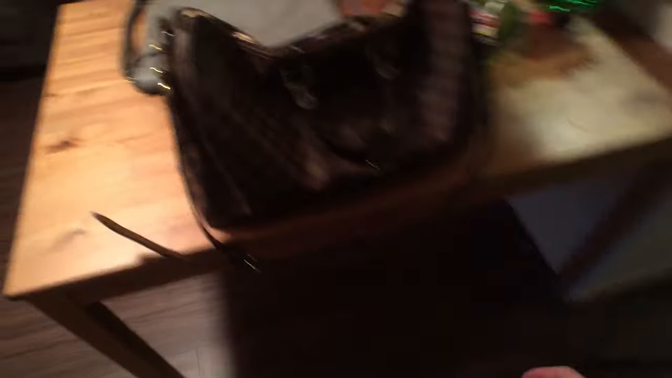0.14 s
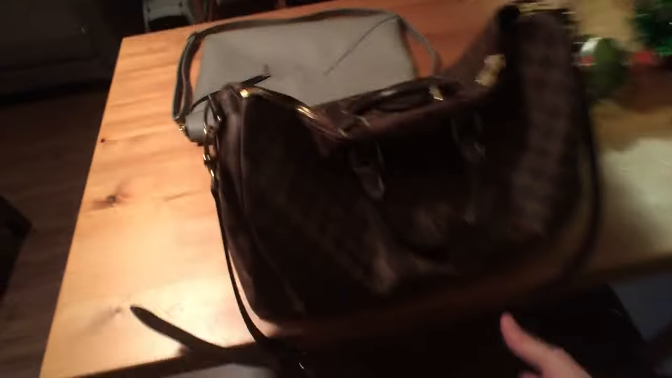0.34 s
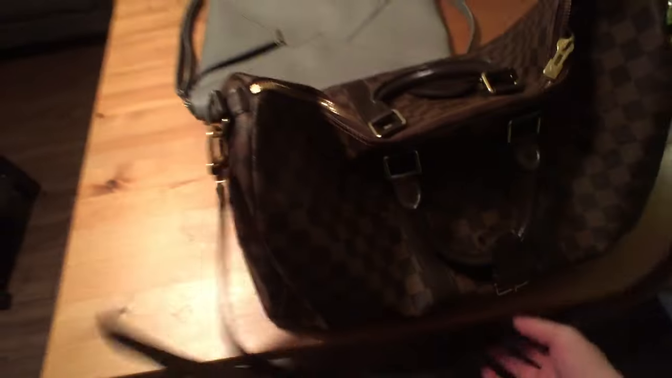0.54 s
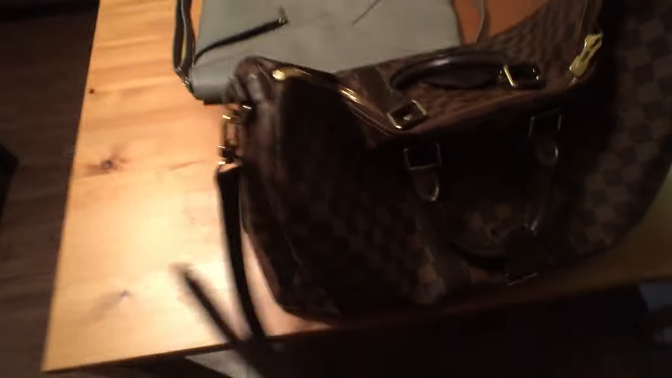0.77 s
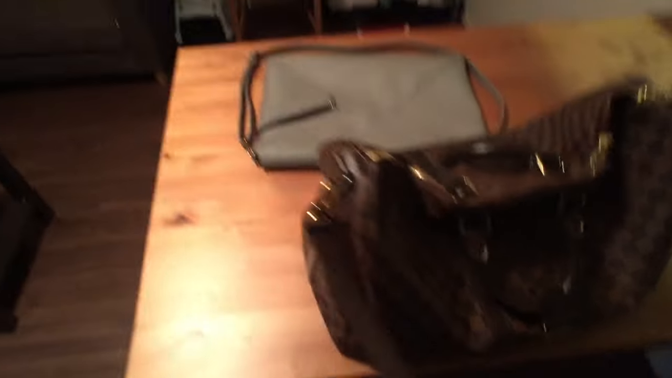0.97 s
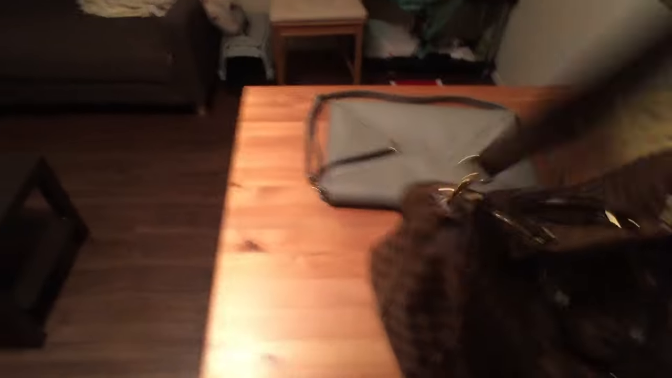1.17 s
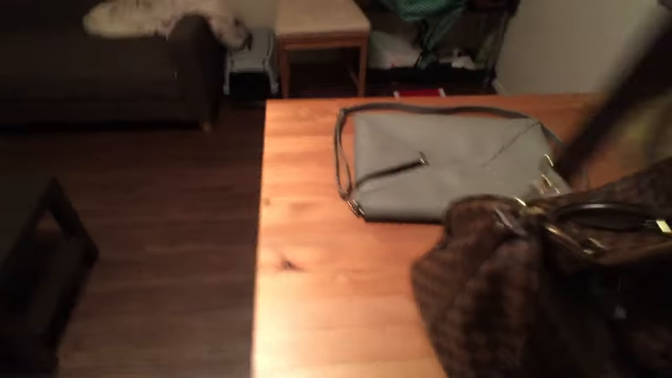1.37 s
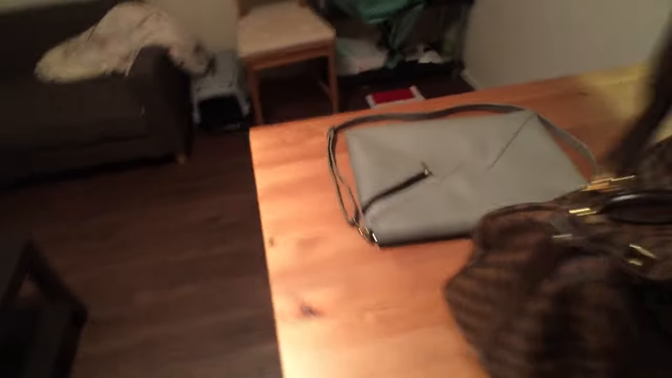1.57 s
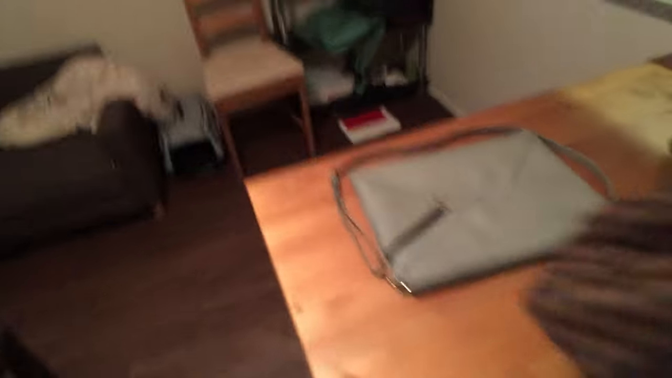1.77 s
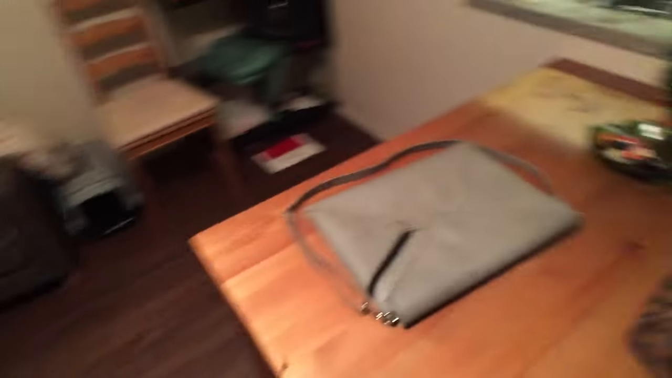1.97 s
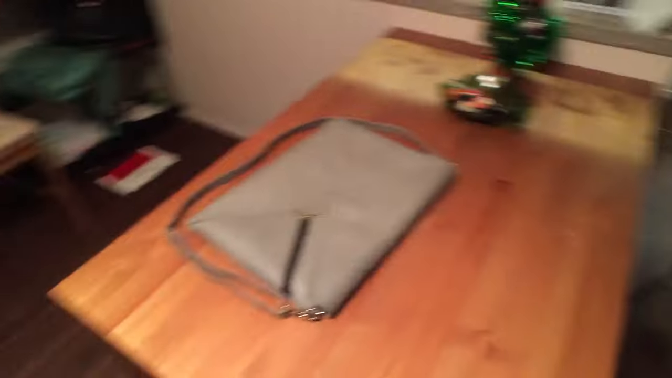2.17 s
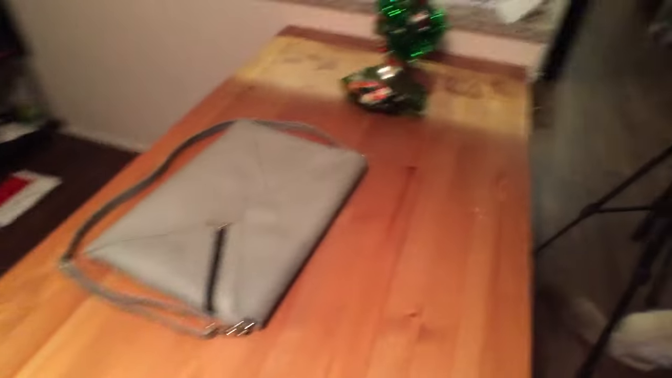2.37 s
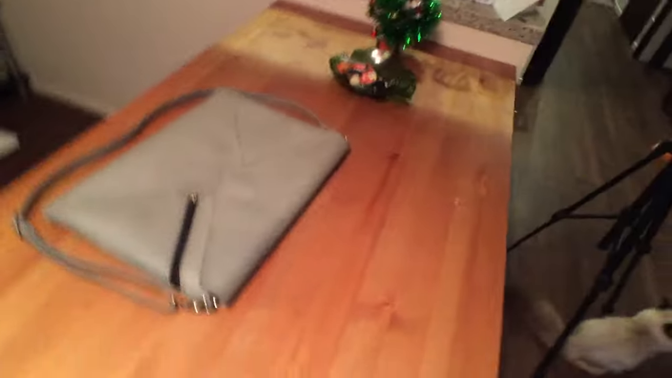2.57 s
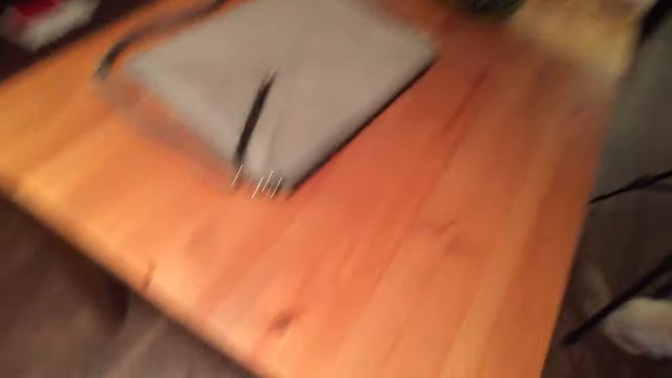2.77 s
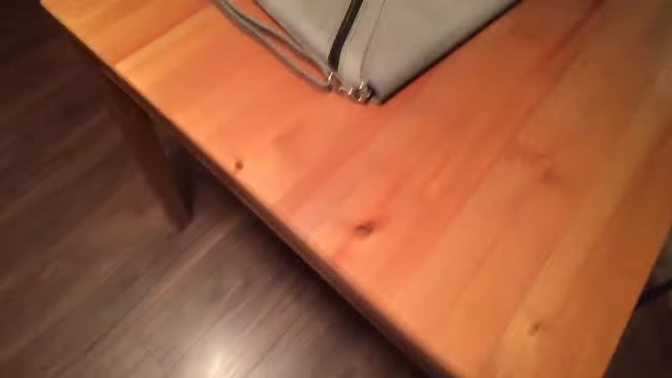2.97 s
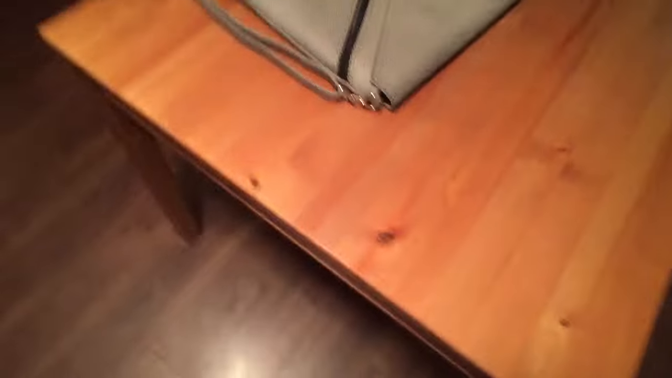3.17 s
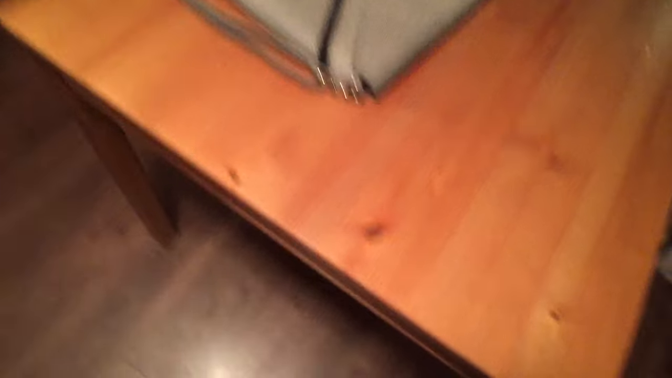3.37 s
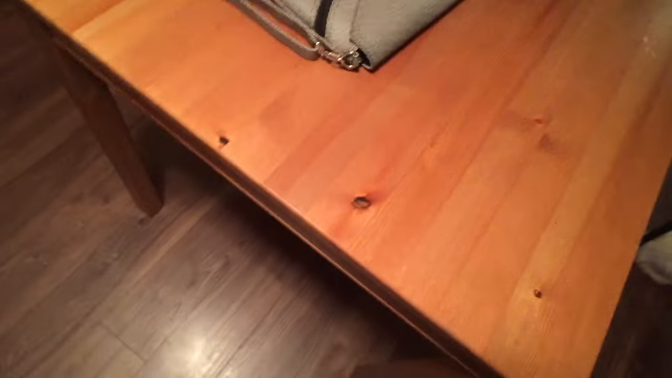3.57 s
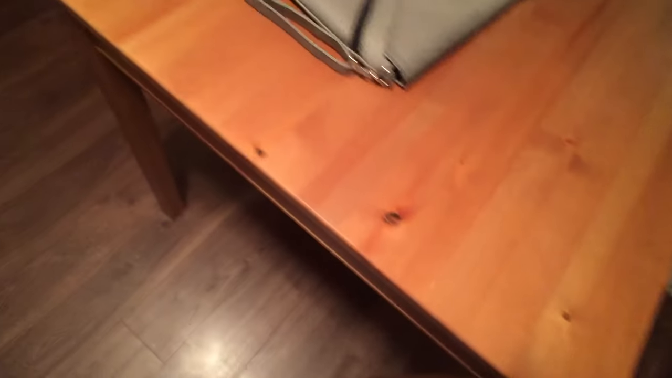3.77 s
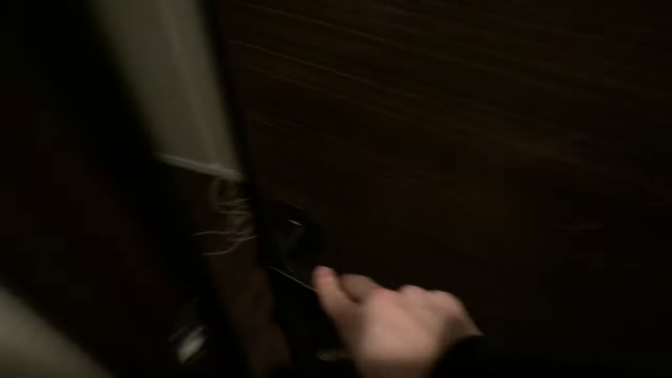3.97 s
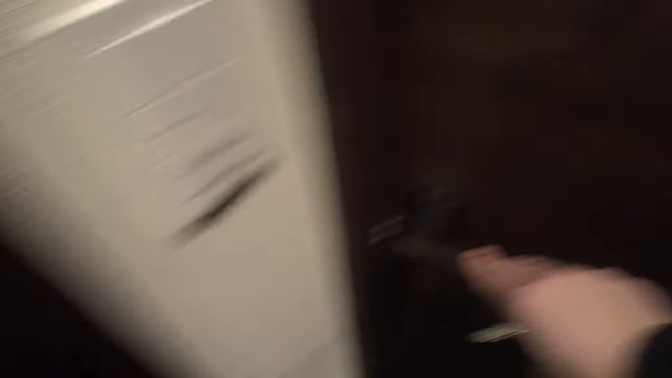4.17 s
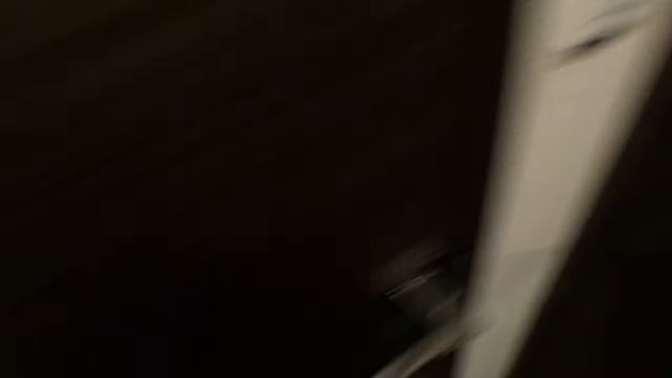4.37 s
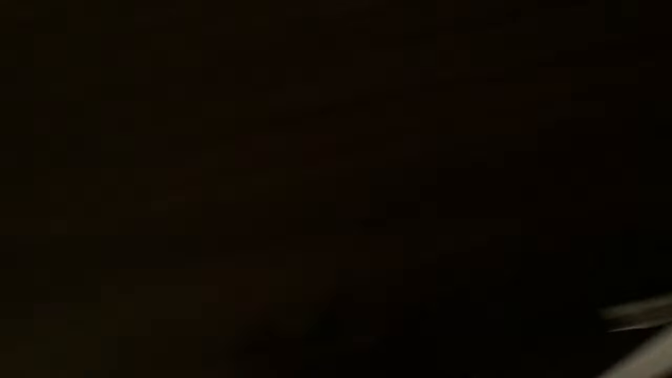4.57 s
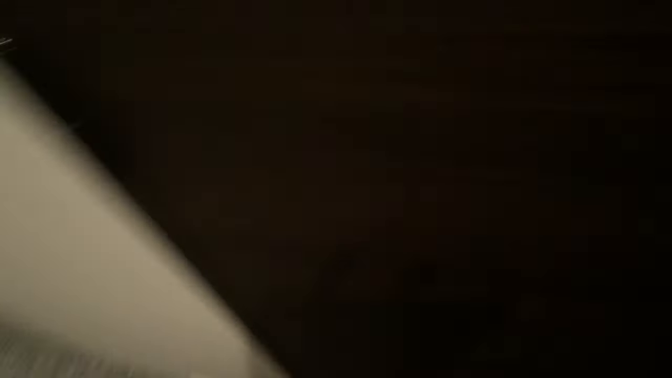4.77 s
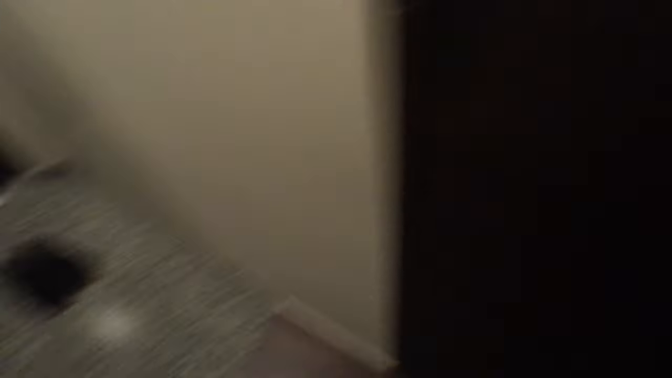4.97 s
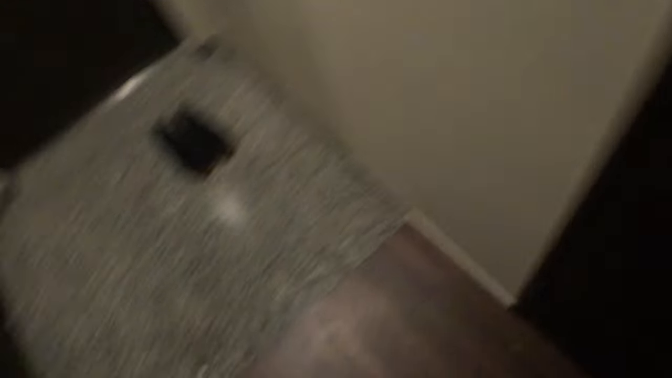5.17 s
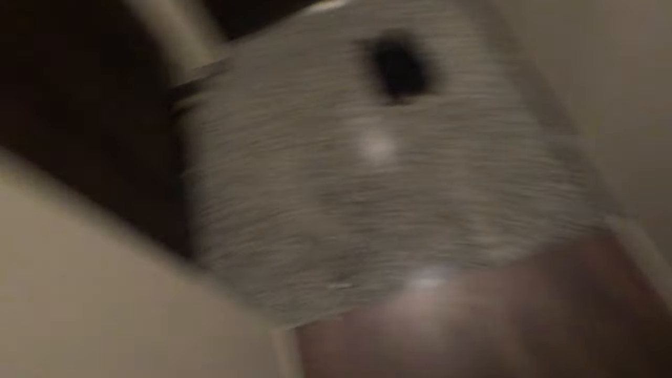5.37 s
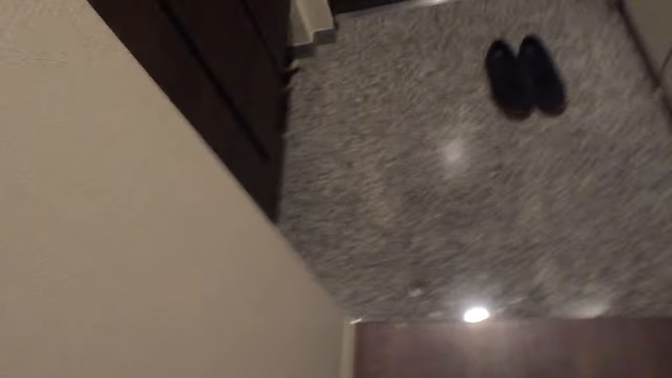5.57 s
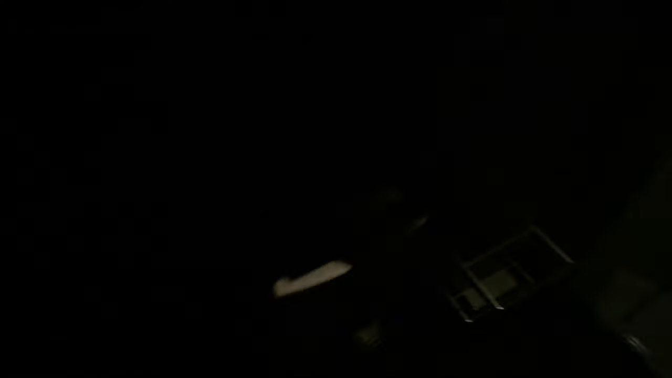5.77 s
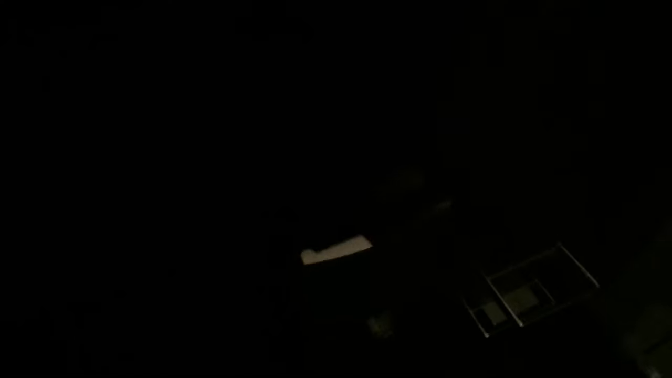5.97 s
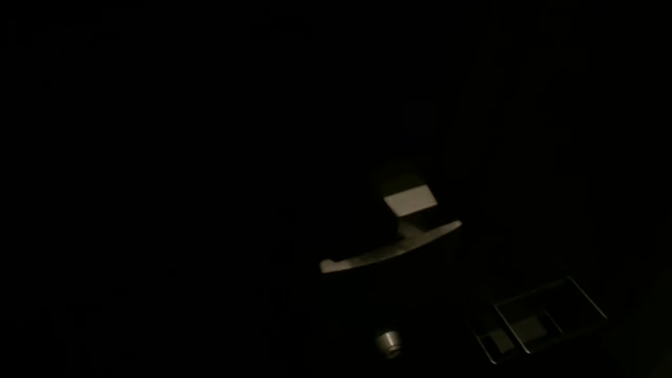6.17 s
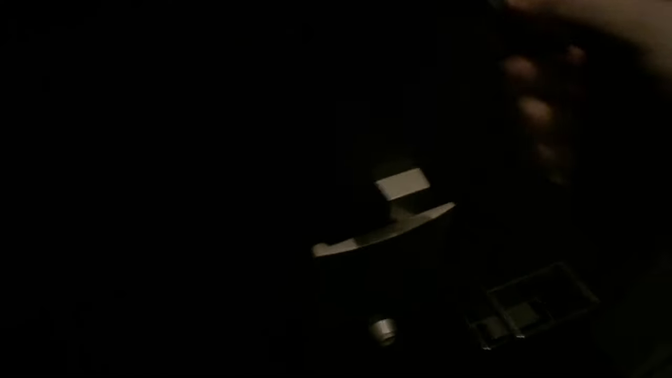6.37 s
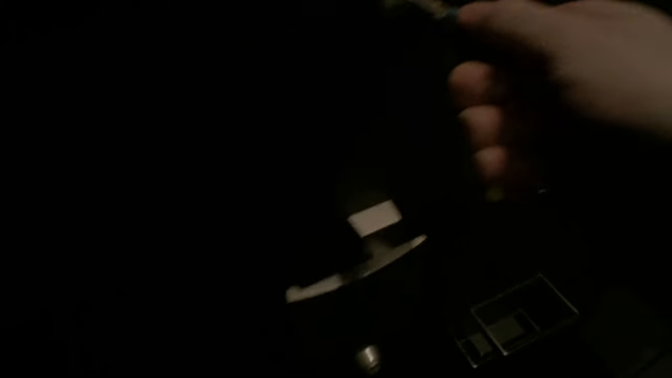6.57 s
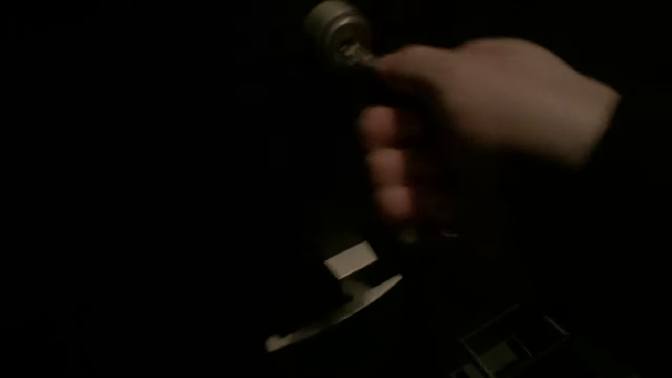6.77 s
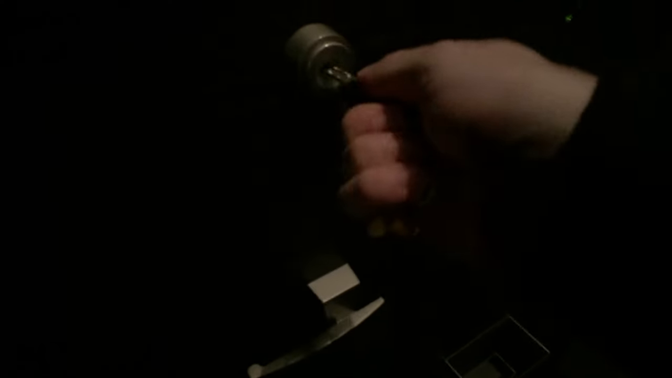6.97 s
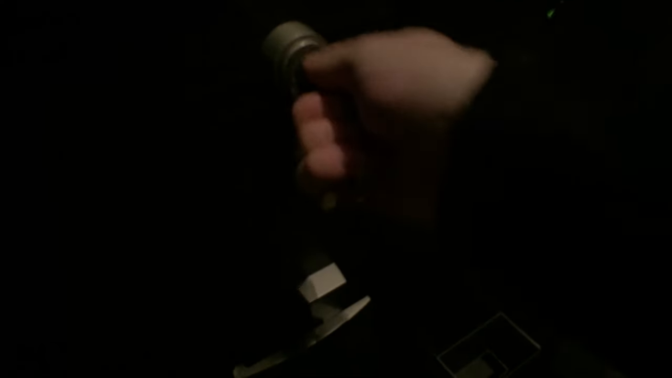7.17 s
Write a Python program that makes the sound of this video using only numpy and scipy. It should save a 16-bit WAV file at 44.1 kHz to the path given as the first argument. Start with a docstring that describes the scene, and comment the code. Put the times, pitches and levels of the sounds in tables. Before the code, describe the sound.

A leather bag is dragged and lifted off a wooden table, rustling and bumping softly while its brass buckle clinks. After a few dull knocks, a door latch clicks sharply and the wooden door opens with a heavy thud. It then shuts with another thud and a ringing rattle of the lock. A key ticks against the lock and scrapes in. Everything is close, in a quiet room and then a hallway.

```python
"""A wooden door is unlatched and shut, then shuts again, heard from the hall: its panel thuds, its latch
clicks and its metal lock rings. A key then ticks against the lock and scrapes in over the pins.
Before the door, a leather bag is dragged and lifted off a wooden table, and its brass buckle clinks.
Cloth and leather rub and rustle throughout, with a few short squeaks, over a quiet room."""
import sys
import numpy as np
from scipy import signal
from scipy.fft import rfft, irfft, next_fast_len
from scipy.io import wavfile
from scipy.ndimage import map_coordinates

SR = 44100
rng = np.random.default_rng(int(sys.argv[2]) if len(sys.argv) > 2 else 0)


def to_wav(s):
    """Save 16-bit WAV."""
    ch = np.atleast_2d(s).T  # columns
    pcm = np.round(np.clip(ch, -1, 1) * 32767)  # PCM
    wavfile.write(sys.argv[1], SR, pcm.astype(np.int16))


N = 318754
HALL_S = 5.85  # from here on we listen in the hall

# the room's echo; a ring time is how long a sound takes to fall 60 dB: (pitch [Hz], ring time [s])
ROOM = [(300, 0.36), (1300, 0.31), (4000, 0.4), (8000, 0.25), (15000, 0.19)]
# faint, constant stirring between the bigger moves: (time [s], rubbing [dB], shaking [dB])
STIR = [(0, -74, -70.5), (.4, -62.5, -56), (1.1, -66.5, -54), (1.4, -75, -61), (2.1, -81, -62.5),
        (2.75, -69, -66), (3.45, -72.5, -63), (3.83, -76.5, -71), (3.9, -67.5, -75), (4.15, -65.5, -43),
        (4.3, -67, -57), (4.9, -67, -72.5), (5.4, -71, -63.5), (5.75, -69, -75), (5.84, -64, -68),
        (6.25, -80.5, -67.5), (6.45, -76, -55), (7.23, -69.5, -51.5)]


def door_thuds():
    """Each blow makes the wooden door ring with a few low tones."""
    blows = [(4.223, -32.5, 5.5), (4.272, -22, -10), (4.311, -33, 1), (4.517, 5.5, 2), (4.54, -17, 1.5),
             (4.598, -14, 3), (5.891, -30.5, 5), (5.961, -2.5, 0), (6.004, -15.5, 5), (6.034, -8.5, -1.5),
             (6.475, -48, 10), (6.634, -58, 10.5), (6.692, -49.5, 9.5), (6.815, -51.5, 11)]  # (time [s], level [dB], brightness [dB per octave])
    tones = [(54.8, -1.5, .4), (78.9, -2.5, 0.42), (133.4, -10, 0.23), (175.4, 1, 0.12), (234, -1.5, 0.081),
             (294.5, -18, 0.28), (413.4, -16, 0.13), (540, -21, 0.11)]  # (pitch [Hz], level [dB], ring time [s])
    return struck(blows, tones, attack_s=0.0035, drop_db=9, flutter=0.0094)


def lock_rattle():
    """Latch and key shake the metal case of the lock, which rings."""
    blows = [(4.313, -16, 9.5), (4.521, -14.5, 5), (5.068, -12, -14.5), (5.896, -25, 9.5),
             (5.971, -31, 16.5), (6.006, -11.5, 0.5), (6.467, -15, -6), (6.633, -21.5, -10.5),
             (6.69, -27.5, -3.5), (6.812, -28.5, 4), (7.007, -26.5, -18), (7.152, -8.5, -13.5)]  # (time [s], level [dB], brightness [dB per octave])
    tones = [(882, -6, 0.27), (1052, 0.5, 0.16), (1270, 5, 0.29), (1400, 4.5, 0.32), (1562, 0.5, 0.44),
             (1768, 5, 0.086), (2084, 7.5, 0.09), (2670, 0, 0.11), (3640, -5, 0.052), (5420, -16.5, .06),
             (6250, -15, 0.033)]  # (pitch [Hz], level [dB], ring time [s])
    return struck(blows, tones, attack_s=0.00025, drop_db=21.5, flutter=0.093)


def metal_clicks():
    """Buckle, latch and key hit hard: each contact is a burst of noise that echoes in room or hall."""
    # (time [s], middle band [dB], low band [dB], high band [dB], echo compared with the burst [dB])
    contacts = [(0.143, -64, -42, -65, -12), (0.6185, -21.5, -26.5, -25.5, 11),
                (0.6688, -37, -16.5, -44, -2), (0.8704, -40, -28, -32, -5), (0.953, -44, -37, -65, -14),
                (0.9715, -45, -24.5, -61, -4), (1.1564, -30.5, -34, -32.5, 1.5),
                (1.1608, -28, -29.5, -22, -5), (1.2174, -39, -43, -49, -7), (1.2447, -22, -62, -11, -6),
                (1.2914, -29, -58.5, -44, -17), (1.4361, -43.5, -49, -39, 7), (1.4753, -36.5, -61, -67, -9),
                (1.5692, -33.5, -44, -60.5, -17), (1.6908, -59, -29, -40, 7), (1.728, -26, -31, -20.5, 5.5),
                (1.7573, -24, -43, -19, -2), (1.8545, -26, -49, -16, -2), (1.908, -25, -53, -42, -1.5),
                (2.5679, -68, -35, -71, -4), (2.9239, -55, -41, -61.5, 4.5), (3.0417, -52, -29, -70, 2),
                (3.34, -69, -34, -73, 3.5), (4.2237, -39, -33, -83.5, -10), (4.313, -3, -7, -8, -2.5),
                (4.519, -36, -12.5, -43, 9.5), (4.5321, -14, -6, -33.5, 3.5), (4.9412, -41, -80, -46, 9),
                (5.0693, -24, -27.5, -26, 14), (5.2464, -38, -38.5, -40, 6.5),
                (5.684, -38, -83.5, -44, -5.5), (5.893, -20.5, -23.5, -23.5, -3),
                (5.9597, -30, -11.5, -42.5, 12.5), (5.9693, -11.5, -15, -33.5, -0.5),
                (6.0072, -4, 1, -8.5, -1), (6.0338, -9.5, -12, -19.5, -3.5),
                (6.4687, -31.5, -16.5, -33, -1), (6.4705, -4.5, -26, -2.5, -15),
                (6.5835, -28, -39, -35, -6.5), (6.6341, -10, -54, -26, -18),
                (6.6625, -19.5, -33, -34, -0.5), (6.6922, -11.5, -27.5, -20, -13),
                (6.8128, -10.5, -25, -13.5, -5), (6.8504, -26, -27, -47, -26),
                (6.9287, -34.5, -71, -28.5, -12.5), (7.0294, -33.5, -64, -66, -5),
                (7.0836, -33.5, -40, -46, -5), (7.123, -28, -60, -51, -13), (7.1264, -27, -50, -31, -15)]
    hall = [(300, 0.057), (1400, 0.35), (3000, 0.22), (8000, 0.18), (15000, 0.11)]  # the hall's echo: (pitch [Hz], ring time [s])
    key_from_s, echo_delay_s = 6.4, .003
    out, t = np.zeros(N + SR), np.arange(SR // 8) / SR
    for s, mid_db, low_db, high_db, echo_db in contacts:
        # the small key sounds in narrower bands
        edges_hz = [(3700, 8000), (700, 2000)] if s > key_from_s else [(2400, 8000), (600, 2400)]
        edges_hz.append((8000, 17000))
        bands = [signal.butter(3, edge, "bandpass", fs=SR, output="sos") for edge in edges_hz]
        gains = amp([mid_db, low_db, high_db])
        ring_s = 0.0097 * amp(0.24 * (mid_db + 22))  # harder contacts last longer
        fade = amp(-60 * t / ring_s)
        parts = [unit(signal.sosfilt(band, fade * rng.standard_normal(len(t)))) for band in bands]
        burst = (gains @ parts) * amp(-6.5) * np.sqrt(np.mean(fade ** 2))
        tail = room_tail(hall if s > HALL_S else ROOM, count=SR * 2 // 3)
        echo = gains @ [unit(signal.sosfilt(band, tail)) for band in bands]
        echo *= amp(echo_db) * np.linalg.norm(burst) / np.linalg.norm(echo)
        out[round(s * SR):][:len(t)] += burst
        out[round((s + echo_delay_s) * SR):][:len(echo)] += echo
    return out[:N]


def key_taps():
    """The key taps the lock's cylinder, and both ring with high tones."""
    taps = [(6.47, -22.5, 4), (6.634, -28.5, -3), (6.663, -43, -9), (6.692, -45, 5), (6.813, -32, -2)]  # (time [s], level [dB], brightness [dB per octave])
    tones = [(4060, -3, 0.18), (5400, 0, 0.073), (6900, -4, .07), (9200, -1, 0.055), (9895, -12, .08)]  # (pitch [Hz], level [dB], ring time [s])
    return struck(taps, tones, attack_s=.0005, drop_db=6, flutter=.1)


def key_scrape():
    """The key hisses into the lock; 13 pin jumps over its teeth each add a tiny burst."""
    slide = [(7.14, -43), (7.228, -18.5)]  # (time [s], level [dB])
    spectrum = [(290, -46), (500, -14), (1090, -16.5), (1290, -9), (2320, -20), (2940, -10.5), (7490, -5.5),
                (9060, 0), (10000, -7.5), (12100, -0.5), (15800, -4.5), (16500, -18)]  # scraping metal: (pitch [Hz], level [dB])
    first_pin_s, pin_step_s, hardest_push_s = 7.1467, .0064, 7.185
    t = np.arange(N) / SR
    force = amp(curves(slide)[0]) * (t > slide[0][0])
    for pin in range(13):
        s = first_pin_s + pin_step_s * pin + 0.00071 * rng.standard_normal()
        db = -11.5 - 296 * abs(s - hardest_push_s) + 1.5 * rng.standard_normal()
        age = np.clip(t - s, 0, None) / 0.0015  # each burst peaks after 1.5 ms
        force += amp(db) * age * np.exp(1 - age)
    return force * rubbing(spectrum, 300, lumpy_db=2.0)


def buckle_clinks():
    """The brass buckle's ring, hook and pin each have their own tones, and the room echoes them."""
    clinks = [(1.162, -31.5, -43, -36), (1.2453, -24.5, -19, -22), (1.257, -31.5, -29, -35),
              (1.4351, -54, -53, -64)]  # (time [s], ring [dB], hook [dB], pin [dB])
    brass = [
        [(5660, 15, 0.026), (5780, -20.5, 0.93)],
        [(6670, 16, 0.026), (6160, -9.5, .3), (6570, 7, 0.028), (7100, -8.5, 0.34), (7560, -2, .06)],
        [(14300, 5, 0.21), (14390, 20, 0.043)],
    ]  # one list for each part: (pitch [Hz], level [dB], ring time [s])
    times, *part_levels = np.transpose(clinks)
    direct = np.zeros(N)
    for db, tones in zip(part_levels, brass):
        blows = np.c_[times, db, np.zeros_like(times)]
        direct += struck(blows, tones, attack_s=0.00039, drop_db=9, flutter=0.073)
    echo = signal.fftconvolve(direct, room_tail(ROOM, count=SR // 2))[:N]
    return direct + amp(-13.5) * echo


def table_knocks():
    """Bag and feet knock on table and floor, which give dull wooden tones."""
    knocks = [(0.142, -39, 5.5), (0.668, -35, 11.5), (0.857, -29.5, 5.5), (0.953, -34, 5),
              (1.156, -36.5, 5), (1.4, -36.5, 0.5), (1.462, -36.5, -14), (1.661, -34.5, 4), (1.854, -37, 6),
              (2.302, -34, 2.5), (2.557, -45.5, -12), (3.044, -21, 3.5), (3.065, -16.5, 2.5),
              (3.329, -38, -5), (5.245, -61.5, -3)]  # (time [s], level [dB], brightness [dB per octave])
    tones = [(133, -6, 0.38), (191.7, 5.5, 0.068), (258, 2, 0.065), (378, -7, .08), (590, -11.5, 0.054),
             (995, -19.5, 0.035), (1344, -30, .04), (1880, -38, 0.037)]  # (pitch [Hz], level [dB], ring time [s])
    return struck(knocks, tones, attack_s=0.003, drop_db=5.5, flutter=0.0076)


def wood_rumble():
    """Bag, steps and door shake wood and floor: a deep rumble with a boom above it."""
    jolts = [(.05, .04, .1, -58, -64), (.145, 0.015, 0.64, -49, -49), (.37, 0.3, 0.042, -50, -53),
             (.48, 0.074, 0.092, -43.5, -53), (.63, .12, 0.3, -38.5, -31.5), (.73, 0.088, 0.27, -37, -45),
             (.94, 0.071, 0.16, -48.5, -46), (1.015, 0.12, 0.14, -51, -34), (1.05, .06, 0.033, -36.5, -48),
             (1.15, 0.031, 0.24, -63, -33), (1.27, 0.083, 0.083, -52.5, -44),
             (1.49, 0.094, 0.1, -59.5, -41), (1.76, 0.085, 0.068, -39, -29.5),
             (1.87, 0.042, 0.16, -51, -35), (2.35, 0.12, 0.12, -43.5, -47), (2.47, 0.15, 0.068, -48.5, -72),
             (2.67, 0.21, 0.075, -59.5, -45), (2.97, 0.27, .1, -57, -48.5), (3.065, 0.035, 0.13, -37, -24),
             (3.22, 0.055, 0.06, -54.5, -45.5), (3.34, 0.046, 0.098, -55, -53),
             (4.055, 0.021, 0.2, -33.5, -38.5), (4.116, 0.066, 0.29, -39.5, -51),
             (4.286, 0.029, 0.023, -20, -25), (4.33, 0.022, 0.061, -36, -15.5),
             (4.62, 0.35, 0.13, -28, -28), (4.744, 0.045, 0.22, -31, -38.5), (5.11, 0.023, 0.12, -58, -41),
             (5.165, .05, 0.13, -49, -50), (5.484, 0.035, .06, -46, -80), (5.792, 0.037, 0.07, -63, -68),
             (5.93, 0.062, 0.17, -56.5, -29), (5.96, 0.017, 0.99, -28, -36), (6.09, 0.39, 0.2, -35.5, -42),
             (6.5, 0.038, 0.045, -47, -49), (6.85, .1, .12, -39, -54), (7.03, 0.055, .06, -41, -62),
             (7.185, 0.066, 0.17, -29, -40.5)]  # (loudest at [s], swell [s], fade [s], deep [dB], boom [dB])
    deep_spectrum = [(25, -18.5), (50, 4), (80, 1), (110, -7), (160, -28), (300, -120)]  # (pitch [Hz], level [dB])
    boom_spectrum = [(50, -46.5), (110, -8), (150, 0.5), (210, -2), (256, 0), (395, -14), (600, -33.5),
                     (1100, -120)]  # (pitch [Hz], level [dB])
    _, shake_db = curves(STIR)
    in_hall = np.arange(N) / SR > HALL_S
    stir = amp([shake_db + 9 * in_hall, shake_db - 13])  # the hall hums lower
    deep, boom = np.hypot(swells(jolts), stir)
    return deep * rubbing(deep_spectrum, 9, lumpy_db=2.0) + boom * rubbing(boom_spectrum, 25, lumpy_db=1)


def leather_and_cloth():
    """Each stroke of rubbing mixes a leather scuff, a cloth rustle and a fine hiss."""
    # (loudest at [s], swell [s], fade [s], scuff [dB], rustle [dB], hiss [dB])
    strokes = [(.146, 0.0084, 0.07, -52, -78, -79), (.24, 0.088, 0.13, -57.5, -48, -50),
               (.56, 0.047, 0.19, -52.5, -46.5, -59), (.622, 0.024, 0.23, -49, -32.5, -39.5),
               (.68, 0.17, 0.33, -38, -55, -64), (.866, 0.017, 0.035, -49, -59, -55.5),
               (.958, 0.0099, 0.22, -44.5, -56, -64), (1.15, 0.024, 0.12, -52, -81, -52),
               (1.285, 0.085, .04, -59, -54, -48), (1.54, 0.071, 0.22, -56.5, -53, -54.5),
               (1.66, 0.016, 0.27, -45, -59, -68), (1.724, 0.0074, .07, -53, -40.5, -52),
               (1.764, 0.038, 0.16, -40, -63, -38.5), (1.856, 0.0068, 0.09, -35, -62, -39),
               (1.908, 0.037, 0.093, -55.5, -81, -44.5), (2.12, .07, .09, -57.5, -53.5, -54),
               (2.324, 0.3, 0.18, -60.5, -61.5, -61), (2.559, 0.015, 0.22, -52, -70, -69),
               (2.845, .03, .08, -63, -75, -54), (2.921, 0.025, 0.22, -54.5, -78.5, -69),
               (3.025, .1, .05, -74, -76, -65), (3.046, 0.013, 0.25, -44, -58.5, -64),
               (3.11, 0.11, 0.099, -36.5, -54, -59), (3.345, .04, 0.086, -53.5, -65, -74.5),
               (4.046, 0.073, 0.0063, -51, -43.5, -42), (4.094, 0.029, 0.13, -48.5, -50.5, -53.5),
               (4.42, .2, 0.079, -40, -50, -64), (4.472, 0.021, 0.057, -33, -50, -68),
               (4.52, 0.025, 0.24, -33, -55.5, -81), (4.79, .05, 0.075, -71, -61, -60),
               (5.06, 0.028, 0.31, -46.5, -56.5, -51), (5.265, 0.14, 0.08, -48, -60, -68),
               (5.521, 0.058, 0.044, -65, -60.5, -49.5), (5.583, 0.034, 0.092, -59.5, -54, -46),
               (5.96, .02, 0.26, -32, -41.5, -56), (6.138, 0.057, 0.054, -38, -46.5, -49),
               (6.26, 0.12, 0.32, -48, -97.5, -82), (6.465, 0.036, 0.83, -63, -60.5, -72),
               (7.018, 0.025, 0.043, -55, -55.5, -75), (7.14, 0.023, .5, -48.5, -60, -64)]
    scuff_spectrum = [(200, -29), (320, 3.5), (600, 1.5), (1000, -0.5), (1900, -6), (2500, -13),
                      (3500, -24), (7000, -120)]  # (pitch [Hz], level [dB])
    rustle_spectrum = [(1000, -24.5), (2000, -4), (3500, -2), (5000, -5), (7000, -17), (9500, -33.5),
                       (13000, -26), (17000, -120)]  # (pitch [Hz], level [dB])
    hiss_spectrum = [(2500, -120), (4500, -13), (7000, 2.5), (10000, -1.5), (14000, -3), (17000, -2)]  # (pitch [Hz], level [dB])
    rub_db, _ = curves(STIR)
    stir = amp([rub_db - 1, rub_db, rub_db + 1])
    scuff, rustle, hiss = np.hypot(swells(strokes), stir)
    return (scuff * rubbing(scuff_spectrum, 60, lumpy_db=2.5, grit_db=1.8)
            + rustle * rubbing(rustle_spectrum, 90, lumpy_db=0.9, grit_db=1.5)
            + hiss * rubbing(hiss_spectrum, 90, lumpy_db=1.7))


def squeaks():
    """Each squeak, as of boards, soles or leather, is one wavering tone that dies fast."""
    creaks = [(2.922, -51, 1965), (2.935, -51, 1084), (3.333, -53, 1174), (5.072, -29.5, 329.5),
              (5.11, -33.5, 350), (5.243, -45.5, 2130), (5.262, -49, 3000), (5.278, -45.5, 617),
              (5.312, -48.5, 211)]  # (time [s], level [dB], pitch [Hz])
    out = np.zeros(N)
    for s, db, hz in creaks:
        ring_s = 0.14 * (1000 / hz) ** .3  # lower ones last longer
        waver = 0.098 * np.sqrt(hz / 1000)
        out += struck([(s, db, 0)], [(hz, 0, ring_s)], attack_s=0.0025, drop_db=-4.5, flutter=waver)
    return out


def room_air():
    """The quiet room is a faint, almost steady noise."""
    spectrum = [(24, -30), (40, -23.5), (300, -3), (427, -15.5), (2140, -18), (2900, -28.5), (3210, -26.5),
                (15300, -31), (16500, -33)]  # (pitch [Hz], level [dB])
    return amp(-67) * rubbing(spectrum, 5, lumpy_db=.7)


def struck(blows, tones, attack_s, drop_db, flutter):
    """Every blow rings the same tones at slightly new strengths; loose parts make them flutter."""
    out, t = np.zeros(N + SR), np.arange(SR * 3 // 4) / SR
    hz, level_db, ring_s = np.transpose(tones)[..., None]
    for s, db, brightness in blows:
        tone_db = level_db + brightness * np.log2(hz / hz[0]) + 1.5 * rng.standard_normal(hz.shape)
        wander = flutter * np.cumsum(rng.standard_normal((len(hz), len(t))), axis=1)
        ring = (amp(tone_db - 60 * t / ring_s) * np.sin(2 * np.pi * hz * t + wander)).sum(0)
        out[round(s * SR):][:len(t)] += amp(db - drop_db) * ring * (1 - np.exp(-t / attack_s))
    return out[:N]


def rubbing(spectrum, rate, lumpy_db, grit_db=0):
    """Noise that catches and slips rate times a second; grit roughens it every millisecond."""
    grit = amp(grit_db * (rng.exponential(size=N // 44 + 1) - 1)).repeat(44)[:N]
    slips = rng.standard_normal(N) * amp(lumpy_db * wobble(rate)) * grit
    return unit(filtered(slips, lambda hz: amp(along(spectrum, hz))))


def swells(rows):
    """One gain curve per level column; each event climbs 20 dB in its swell and drops 20 in its fade."""
    t, power = np.arange(0, N + 32, 32) / SR, 0
    for s, swell, fade, *db in rows:
        away = np.where(t < s, (s - t) / max(swell, .003), (t - s) / max(fade, .003))
        power = power + amp(np.array(db)[:, None] - 20 * away) ** 2
    return [np.interp(np.arange(N) / SR, t, np.sqrt(p)) for p in power]


def room_tail(space, count):
    """An echo made of noise, count samples long; each pitch dies at its own speed."""
    hz, t, noise = signal.stft(rng.standard_normal(count), SR, nperseg=256)
    fade = amp(-60 * t / along(space, hz)[:, None])
    tail = signal.istft(noise * fade, SR, nperseg=256)[1][:count]
    return tail / np.linalg.norm(tail)


def amp(db):
    """Turn decibels into a gain."""
    return 10 ** (np.asarray(db) / 20)


def unit(x):
    """Scale x to an average strength (rms) of 1."""
    return x / np.sqrt(np.mean(x ** 2) + 1e-20)


def along(points, hz):
    """Read between (pitch [Hz], value) points on a log scale of pitch."""
    pitches, values = np.transpose(points)
    return np.interp(np.log(hz + 1), np.log(pitches + 1), values)


def curves(rows):
    """One value per sample for each column after the time."""
    times, *columns = np.transpose(rows)
    return [np.interp(np.arange(N) / SR, times, column) for column in columns]


def wobble(rate):
    """A smooth curve through rate random points a second."""
    return map_coordinates(rng.standard_normal(int(N * rate / SR) + 4), [np.arange(N) * rate / SR])


def filtered(x, response):
    """Scale each frequency in x by response(hz)."""
    size = next_fast_len(len(x) + 8192)
    return irfft(rfft(x, size) * response(np.fft.rfftfreq(size, 1 / SR)), size)[:len(x)]


def scene():
    """Add all the sources into one channel."""
    air = room_air()
    ringing = lock_rattle() + key_taps() + door_thuds() + table_knocks()
    movement = wood_rumble() + leather_and_cloth()
    return (ringing + movement + metal_clicks() + buckle_clinks() + squeaks() + key_scrape() + air)[None]


def record(dry):
    """The microphone colours the sound, softly squashes the loudest peaks and cuts the top treble."""
    microphone = [(20, -18.5), (45, -10), (70, -3), (5300, -1.5), (6400, 2), (7600, -8), (9200, 0.5),
                  (10400, -3.5), (11600, -1.5), (16000, -7.5)]  # (pitch [Hz], gain [dB])
    ceiling, top_hz = .75, 16200
    coloured = filtered(dry[0], lambda hz: amp(along(microphone, hz)))
    squashed = coloured / (1 + np.abs(coloured / ceiling) ** 4) ** .25
    return filtered(squashed, lambda hz: np.clip((top_hz - hz) / 400, 0, 1) ** 2)[None]


dry = scene()
out = record(dry)
to_wav(out)
```